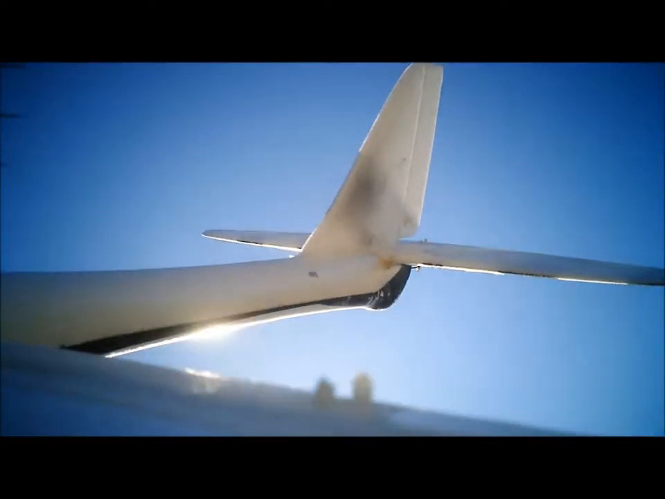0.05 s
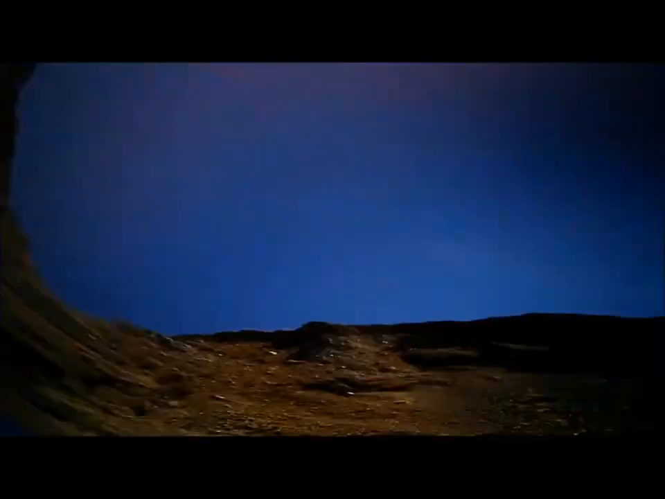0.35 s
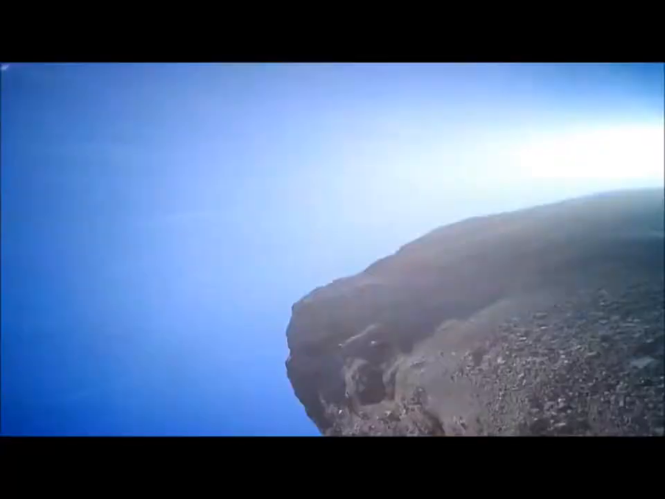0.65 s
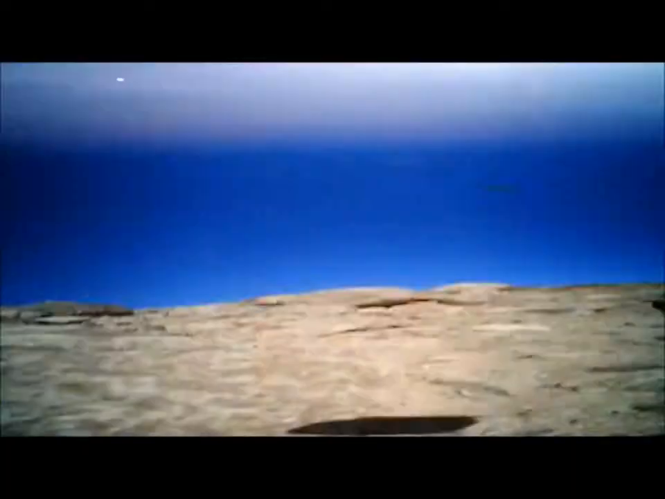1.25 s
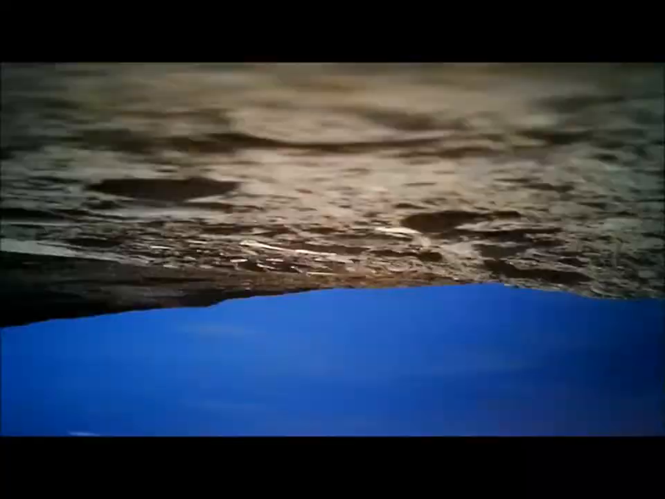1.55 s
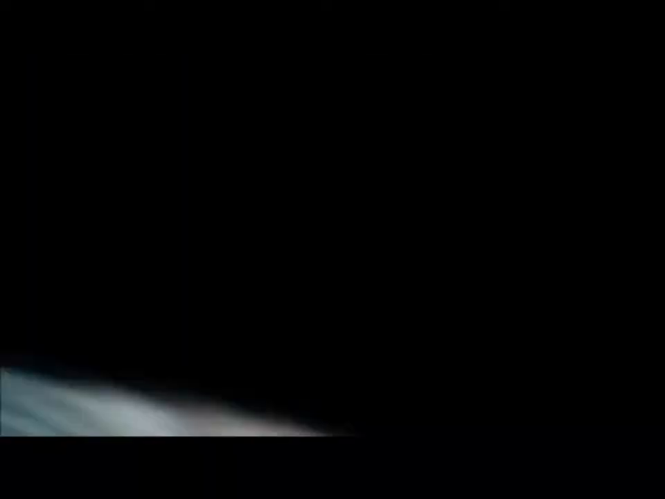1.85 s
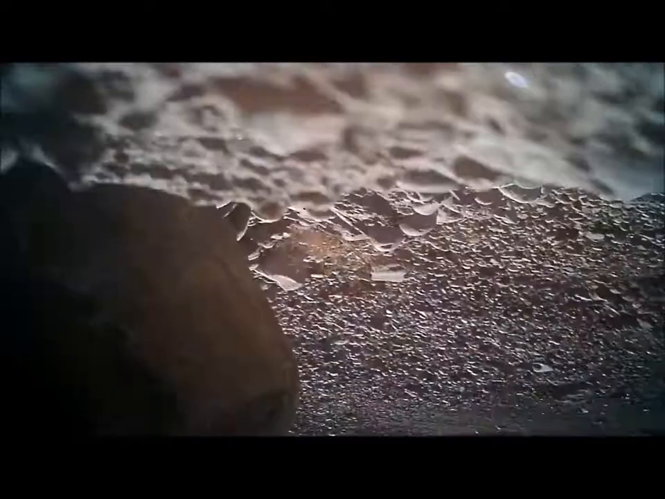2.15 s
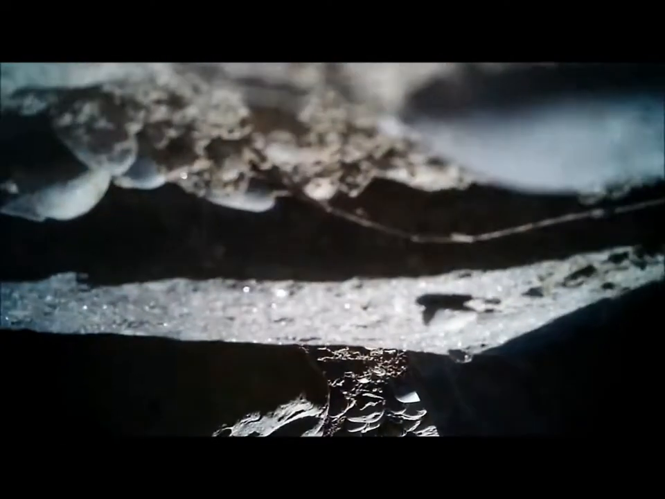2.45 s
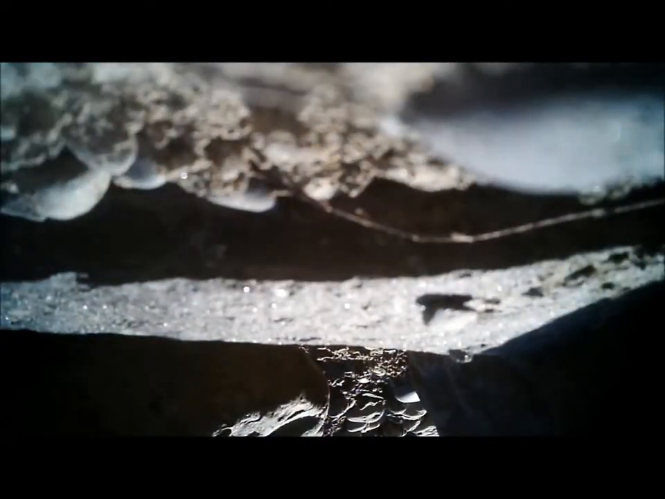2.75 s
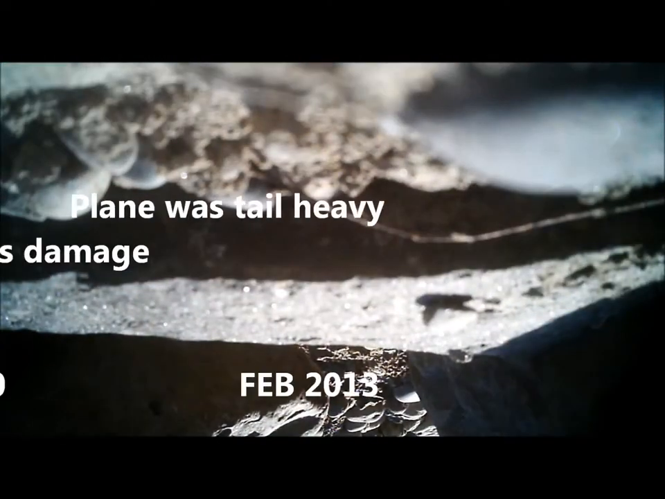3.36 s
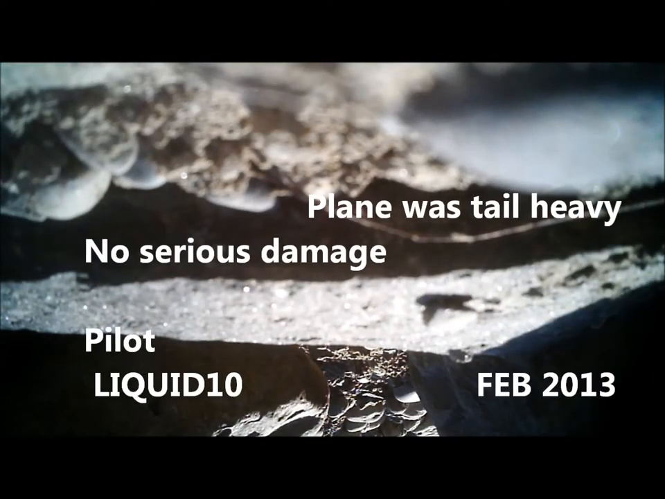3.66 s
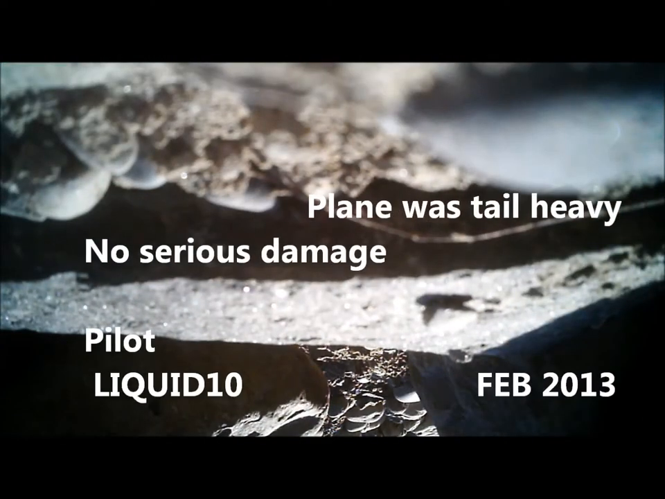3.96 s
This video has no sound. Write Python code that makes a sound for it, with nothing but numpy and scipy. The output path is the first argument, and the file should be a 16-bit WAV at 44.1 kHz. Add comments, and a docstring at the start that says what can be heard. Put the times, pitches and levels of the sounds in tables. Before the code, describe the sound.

A model aircraft crashes and tumbles over gritty ground with wind buffeting, then scrapes to rest.

```python
"""On dry, gritty ground a model aircraft crashes, cartwheels and slides to rest, heard from on board.
The motor's rotation makes a harmonic whine until the first crunch. Turbulence buffets the tumbling
airframe, impacts excite its resonances, and sliding friction rattles grit under the shell.
The small microphone saturates on strong gusts and blows."""
import sys
import numpy as np
from scipy import signal
from scipy.fft import rfft, irfft
from scipy.io import wavfile
from scipy.ndimage import uniform_filter1d

SR = 44100
rng = np.random.default_rng(int(sys.argv[2]) if len(sys.argv) > 2 else 0)


def unload_audio(sound):
    """Save the sound as a 16-bit wav file, at the path given as the first command line argument."""
    columns = np.transpose(np.atleast_2d(sound))
    # keep every value between -1 and 1, then stretch to whole-number steps
    steps = np.round(np.clip(columns, -1, 1) * 32767)
    wavfile.write(sys.argv[1], SR, steps.astype(np.int16))


N = 176400
TIME = np.arange(N) / SR


def amp(db):
    """Decibels to amplitude ratio."""
    return 10 ** (np.asarray(db) / 20)


def unit(x):
    """Normalisation to rms 1."""
    return x / np.sqrt(np.mean(x ** 2) + 1e-20)


def curve(table, column=1):
    """Linear interpolation of a time table's column at every sample."""
    return np.interp(TIME, *np.transpose(table)[[0, column]])


def colour(x, spectrum):
    """Minimum-phase filtering through (Hz, dB) points, at rms 1."""
    hz, db = np.transpose(spectrum)
    f = abs(np.fft.fftfreq(4096, 1 / SR))
    log_gain = np.log(amp(np.interp(np.log(f + 1), np.log(hz), db)))
    kernel = np.fft.ifft(np.exp(np.conj(signal.hilbert(log_gain)))).real
    return unit(signal.oaconvolve(x, kernel)[:len(x)])


def wander(hz):
    """Low-pass noise: smooth random motion at rms 1."""
    f = np.fft.rfftfreq(N, 1 / SR)
    return unit(irfft(rfft(rng.standard_normal(N)) * np.exp(-(f / hz) ** 2), N))


def resonate(x, hz, width_hz):
    """Forced response of a damped resonator of fixed or moving frequency, at rms 1."""
    turn = np.exp(2j * np.pi * np.cumsum(hz * np.ones(len(x))) / SR)
    pole = np.exp(-np.pi * width_hz / SR)
    return unit((turn * signal.lfilter([1 - pole], [1, -pole], x / turn)).real)


def burst(spectrum):
    """A short stretch of filtered white noise."""
    return colour(rng.standard_normal(SR // 8), spectrum)


def grit(per_s, spread_db, size=N):
    """Shot noise: independent clicks of uneven size."""
    strength = amp(spread_db * np.minimum(rng.exponential(1, size), 4))
    return strength * rng.choice([-1., 1.], size) * (rng.random(size) < per_s / SR)


def contact(length, db, sound, ease_s=0.014, release_s=0.00098, dust_s=0.019, dust_db=-41):
    """Exponential decay of a crunch: easing while touching, then a quick release and a trail of dust."""
    t = TIME[:len(sound)]
    after = np.maximum(t - length, 0)
    touch = np.exp((length / 2 - np.minimum(t, length)) / ease_s)
    release = np.exp(-after / release_s) + amp(dust_db) * np.exp(-after / dust_s)
    return amp(db) * touch * release * sound


def place(events):
    """Superposition of (start in seconds, sound) pairs on one track."""
    track = np.zeros(N)
    for start, sound in events:
        part = track[round(start * SR):][:len(sound)]
        part += sound[:len(part)]
    return track


# The motor's run. Each row: time in seconds, fundamental in Hz, level in dB.
MOTOR_RUN = [(0, 1620, -60), (.02, 1660, -19.5), (.042, 1735, -33), (.076, 1705, -29), (.108, 1595, -31),
             (.14, 1585, -33.5), (.175, 1560, -42.5), (.192, 1630, -30.5), (.203, 1590, -31),
             (.215, 1500, -62.5)]
# Each entry: relative level of a harmonic in dB, from the first up.
MOTOR_HARMONICS = [-13.5, 1.5, -7.5, -2, -3, -10, -15, -12.5]

def motor(waver=0.0077, rasp=0.036, flicker_db=3, grind=0.83):
    """Rotation gives a harmonic series, roughened by frequency and amplitude modulation."""
    speed = 1 + waver * wander(150) + rasp * wander(1800)
    phase = 2 * np.pi * np.cumsum(curve(MOTOR_RUN) * speed) / SR
    whine = sum(amp(db + flicker_db * wander(91)) * np.sin(k * phase)
                for k, db in enumerate(MOTOR_HARMONICS, 1))
    whine = unit(whine * (1 + grind * wander(540)))
    return whine * amp(curve(MOTOR_RUN, column=2)) * (TIME < MOTOR_RUN[-1][0])


# The motor's higher whine. Each row: time in seconds, frequency in Hz, level in dB.
SQUEAL_GLIDE = [(0, 5590, -29), (.018, 5540, -34.5), (.03, 5350, -43.5), (.065, 5350, -39),
                (.1, 5250, -50.5)]

def squeal(flicker_db=2, waver=0.012):
    """Random modulation broadens a single sagging tone into a narrow band."""
    flicker = amp(flicker_db * wander(200))
    hz = curve(SQUEAL_GLIDE) * (1 + waver * wander(910))
    tone = unit(flicker * np.sin(2 * np.pi * np.cumsum(hz) / SR))
    return tone * amp(curve(SQUEAL_GLIDE, column=2)) * (TIME < SQUEAL_GLIDE[-1][0])


# Wind on the microphone. Each row: time in seconds, level in dB, flutter rate in Hz.
GUSTS = [(0, -41.5, 30), (.17, -32.5, 13.5), (.28, -27.5, 25.13), (.5, -29.5, 24), (.78, -25.5, 33),
         (.87, -28.5, 44), (.95, -30, 62), (1.08, -34, 68), (1.22, -30.5, 45), (1.3, -49.5, 33),
         (1.43, -30.5, 39), (1.52, -36.5, 48), (1.61, -51, 29), (1.8, -47.5, 12), (1.9, -66, 23),
         (2.12, -54.5, 35), (2.3, -64, 22), (2.7, -69.5, 18), (4, -68.5, 20)]
# Its turbulence. Each row: frequency in Hz, relative level in dB.
WIND_SPECTRUM = [(8, -6.5), (26, 9), (45, -4.5), (75, -1), (110, -13), (200, -21.5), (400, -30.5),
                 (1000, -48), (4000, -78.5)]

def wind(flutter_db=3):
    """Turbulent pressure fluctuations make low, fluttering buffets."""
    flutter = resonate(wander(120), curve(GUSTS, column=2), width_hz=6.54)
    buffet = colour(rng.standard_normal(N), WIND_SPECTRUM) + amp(flutter_db) * flutter
    running_rms = np.sqrt(uniform_filter1d(buffet ** 2, size=4000))
    return buffet / running_rms * amp(curve(GUSTS))


# Rushing air and dust. Each row: time in seconds, level in dB.
DUST_LEVEL = [(0, -37), (.09, -34), (.115, -33.5), (.18, -52), (.2, -33.5), (.26, -18), (.285, -62),
              (.4, -61.5), (.5, -64.5), (.8, -58), (.92, -66), (.97, -61), (1.05, -64.5), (1.3, -69.5),
              (1.44, -74), (1.52, -79), (1.61, -58), (1.68, -70), (1.765, -77), (1.79, -128), (1.86, -92),
              (1.9, -100)]
# Each row: frequency in Hz, relative level in dB.
DUST_SPECTRUM = [(100, 4.5), (300, 3.5), (800, 2), (1600, 1), (2200, -0.5), (3000, -3), (3800, -8),
                 (5200, -11), (7500, -16), (11000, -15.5), (15000, -19.5)]

def rush(flicker_db=7):
    """Dense shot noise merges into a gritty rush of air and dust."""
    grains = colour(grit(per_s=9000, spread_db=6.5), DUST_SPECTRUM)
    return grains * amp(curve(DUST_LEVEL) + flicker_db * wander(70))


# The noise floor. Each row: frequency in Hz, relative level in dB.
HISS_SPECTRUM = [(59, -22), (100, -7), (343, -14), (381, -13), (492, -14), (547, -15), (648, -14),
                 (13200, -30.5), (16000, -33.5)]

def hiss(db=-75.5):
    """Still air and the microphone give faint stationary noise."""
    return amp(db) * colour(rng.standard_normal(N), HISS_SPECTRUM)


# Blows on the ground. Each row: start in seconds, contact in seconds, level in dB, resonance in Hz.
GROUND_BLOWS = [(0.204, 0.028, -17.5, 330), (0.234, 0.031, -16.5, 1500), (0.268, 0.0081, -27, 2130),
                (.797, .010, -4.5, 1930), (0.864, 0.0011, -33, 5560), (0.883, 0.02, -25.5, 2640),
                (1.1389, 0.0065, -14, 1300), (1.161, 0.0036, -15, 1100), (1.2469, 0.025, -16.5, 2230),
                (1.55, 0.013, -22.5, 4070), (1.568, 0.0034, -16.5, 4150), (1.578, 0.0099, -39.5, 2060),
                (1.656, 0.011, -23, 3880), (1.7017, 0.013, -17, 1880), (1.73, 0.0011, -9, 1470),
                (1.7445, 0.0052, -22, 1600), (1.8583, 0.0092, -19, 2990)]
# Each row: frequency in Hz, relative level in dB.
CRUNCH_SPECTRUM = [(40, -7), (280, -0.5), (800, -6), (1300, -1), (2000, -3), (3000, -2.5), (6000, -5.5),
                   (15000, -17)]

def blows(hollow_db=2.5):
    """Each broadband impact drives the main resonance of the part that hits."""
    for start, length, db, hz in GROUND_BLOWS:
        crunch = burst(CRUNCH_SPECTRUM)
        hollow = amp(hollow_db) * resonate(crunch, hz, width_hz=660)
        yield start, contact(length, db, unit(crunch + hollow))


# Each row: start in seconds, level in dB, swing frequency in Hz, decay time in seconds.
AIRFRAME_LURCHES = [(0.25, -14.5, 27, 0.031), (1.143, -23.5, 30, 0.024), (1.249, -15.5, 36, 0.023),
                    (1.549, -14, 27.3, 0.026), (1.654, -18.5, 22, .021), (1.73, -19.5, 30.14, 0.011)]

def lurches():
    """The airframe swings in a heavily damped oscillation after hard blows."""
    t = TIME[:SR // 6]
    for start, db, hz, decay in AIRFRAME_LURCHES:
        yield start, amp(db) * np.sin(2 * np.pi * hz * t) * np.exp(-(t / decay) ** 2)


# The airframe's whistle. Each row: time in seconds, level in dB.
CAVITY_LEVEL = [(.28, -66), (.36, -62.5), (.6, -71), (.85, -67.5), (.96, -61), (1.12, -74.5), (1.3, -80),
                (1.44, -75.5), (1.52, -98)]

def whistle(hz=2750, width_hz=510):
    """Resonance picks a faint band of noise from air crossing the hollow airframe."""
    band = resonate(rng.standard_normal(N), hz, width_hz)
    narrower = resonate(band, hz, width_hz)
    return narrower * amp(curve(CAVITY_LEVEL)) * (TIME < CAVITY_LEVEL[-1][0])


# Each row: start in seconds, length in seconds, level in dB.
GRIT_SPRAYS = [(0.296, 0.0064, -39), (0.32, 0.011, -38.5), (.361, 0.0081, -34.5), (.391, 0.012, -32),
               (.4255, .002, -48), (.45, 0.0082, -36.5), (0.512, 0.0027, -46.5), (0.542, 0.0086, -46.5),
               (0.567, 0.0048, -46), (.587, .004, -49), (0.61, 0.0095, -46.5), (.687, 0.0048, -38.5),
               (0.949, 0.0052, -45), (0.969, 0.0036, -47), (1.323, 0.0017, -57), (1.434, 0.014, -54.5),
               (1.64, 0.0022, -54)]

def sprays():
    """Many tiny impacts of grit on the tumbling airframe merge into bursts of noise."""
    for start, length, db in GRIT_SPRAYS:
        yield start, contact(length, db, burst(DUST_SPECTRUM))


# Each row: start in seconds, level in dB.
SHELL_KNOCKS = [(1.704, -10.5), (1.71, -19.5), (1.718, -19), (1.837, -6.5)]
# Each row: frequency in Hz, relative level in dB, time to fall 60 dB in seconds.
SHELL_MODES = [(1810, -3, .016), (3200, -14, .009)]

def knocks(crack_db=-10.5):
    """A sharp crack leaves the shell's modes in damped free vibration."""
    t = TIME[:SR // 6]
    for start, db in SHELL_KNOCKS:
        yield start, sum(amp(db + mode_db - 60 * t / t60) * np.sin(2 * np.pi * hz * t)
                         for hz, mode_db, t60 in SHELL_MODES)
        yield start, contact(0, db + crack_db, burst(CRUNCH_SPECTRUM))


def chips(low_hz=1500, high_hz=13000, width_hz=250, db_per_octave=-5.5):
    """Random impulses make gravel chips ping, each at its own natural frequency."""
    pings = np.zeros(N)
    for hz in np.geomspace(low_hz, high_hz, 24):
        resonator = signal.iirpeak(hz, hz / width_hz, SR)
        gain = amp(db_per_octave * np.log2(hz / low_hz))
        pings += gain * signal.lfilter(*resonator, grit(per_s=45, spread_db=6))
    return unit(pings)


# The drag over grit. Each row: time in seconds, level in dB.
SLIDE_LEVEL = [(1.85, -89), (1.862, -32), (1.9, -43.5), (1.915, -50), (1.94, -45), (1.975, -31.5),
               (1.995, -42.5), (2.012, -34), (2.05, -42.5), (2.066, -33), (2.08, -46), (2.1, -37),
               (2.11, -53.5), (2.14, -52.5), (2.162, -33), (2.19, -41.5), (2.25, -51.5), (2.262, -51),
               (2.304, -38), (2.325, -50), (2.366, -31), (2.395, -40.5), (2.44, -45), (2.505, -53.5),
               (2.522, -70.5), (2.58, -72), (2.63, -100)]
# Each row: frequency in Hz, relative level in dB.
SLIDE_SPECTRUM = [(60, -23), (300, -22.5), (900, -14.5), (1400, -8.5), (1900, 2), (2200, -2.5), (2550, 3.5),
                  (3000, -9.5), (3300, -5), (3700, -8), (4300, -2), (5200, -13), (6500, -17), (7300, -14),
                  (8500, -20.5), (9900, -16.5), (11500, -22.5), (13500, -16.5), (16000, -30.5)]

def slide(chip_db=-10, judder_db=3):
    """Sliding friction rattles grit and chips under the shell."""
    rattle = colour(grit(per_s=3000, spread_db=4), SLIDE_SPECTRUM) + amp(chip_db) * chips()
    return rattle * amp(curve(SLIDE_LEVEL) + judder_db * wander(140))


# Each row: start in seconds, contact in seconds, level in dB.
CAUGHT_STONES = [(1.875, 0.0013, -12.5), (1.887, 0.0017, -18.5), (1.895, 0.0053, -24.5),
                 (1.936, 0.0022, -29.5), (1.974, 0.0018, -32), (2.007, 0.0045, -37), (2.037, 0.0054, -31),
                 (2.057, 0.0027, -36), (2.089, 0.0054, -28.5), (2.1, 0.0016, -32), (2.145, 0.0022, -36.5),
                 (2.153, 0.0098, -38.5), (2.169, 0.0079, -24.5), (2.199, 0.0017, -30),
                 (2.21, 0.0098, -35.5), (2.226, 0.0014, -34), (2.236, 0.0029, -26.5), (2.245, .01, -29),
                 (2.28, 0.001, -21), (2.292, 0.008, -35), (2.306, 0.0037, -26), (2.336, 0.0014, -18),
                 (2.35, 0.001, -25), (2.365, 0.0016, -32.5)]

def stones(first_click_db=4.5, colour_spread_db=3):
    """Each stone the shell catches gives a short impulse train with a spectrum of its own."""
    for start, length, db in CAUGHT_STONES:
        clicks = grit(per_s=2300, spread_db=3.5, size=SR // 8)
        clicks[0] = amp(first_click_db)
        spectrum = [(hz, level + colour_spread_db * rng.standard_normal()) for hz, level in SLIDE_SPECTRUM]
        yield start, contact(length, db, colour(clicks, spectrum))


# Each row: start in seconds, level in dB.
SETTLING_TICKS = [(2.509, -20), (2.537, -45), (2.563, -52), (2.573, -58)]
# Each row: frequency in Hz, relative level in dB.
TICK_SPECTRUM = [(200, -30), (1200, -29), (2100, 18), (3000, -17), (4200, 10), (6000, -12), (15000, -52)]

def ticks():
    """Settling grains make brief transients with two spectral peaks."""
    for start, db in SETTLING_TICKS:
        yield start, contact(0, db, burst(TICK_SPECTRUM))


# Each row: start in seconds, level in dB.
SOFT_POPS = [(2.9769, -39.5), (3.975, -51)]

def pops(decay_s=0.0042):
    """An exponential pulse holds mostly low frequencies and is heard as a dull pop."""
    for start, db in SOFT_POPS:
        yield start, amp(db) * np.exp(-TIME[:SR // 20] / decay_s)


def scene():
    """Superposition: the pressures of all sources add at one microphone."""
    flight = motor() + squeal() + wind() + rush() + whistle()
    tumble = place([*blows(), *lurches(), *knocks(), *sprays()])
    scrape = slide() + place([*stones(), *ticks()])
    return (flight + tumble + scrape + hiss() + place(pops()))[None]


# The microphone's frequency response. Each row: frequency in Hz, relative gain in dB.
MIC_RESPONSE = [(0, 0.5), (1000, -1.5), (4000, -1), (8500, -1.5), (9900, 1.5), (11300, 0.5), (13500, 1.5),
                (15000, -2.5), (16200, -13)]

def record(dry, overload_db=-27.2, edge_hz=16200):
    """Hard clipping lets strong gusts choke the hiss; filters then colour the treble and limit the band."""
    clipped = np.clip(dry, -amp(overload_db), amp(overload_db))
    response = amp(np.interp(np.fft.rfftfreq(N, 1 / SR), *np.transpose(MIC_RESPONSE)))
    coloured = irfft(rfft(clipped) * response / response[0], N)
    low_pass = signal.firwin(161, edge_hz, window=("kaiser", 9), fs=SR)
    return signal.oaconvolve(coloured, low_pass[None], "same")


dry = scene()
out = record(dry)
unload_audio(out)
```